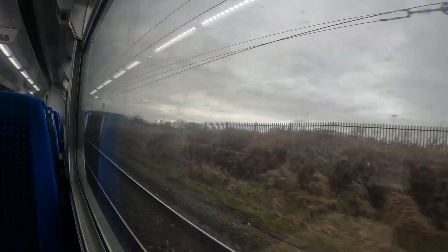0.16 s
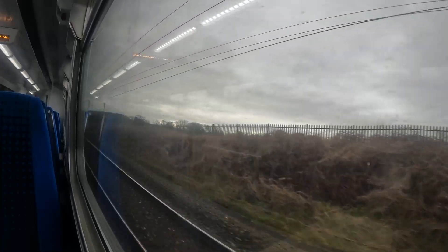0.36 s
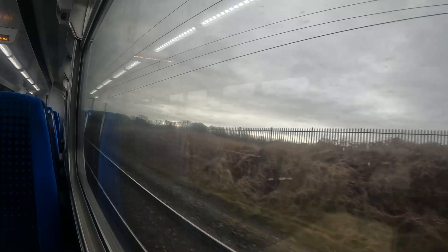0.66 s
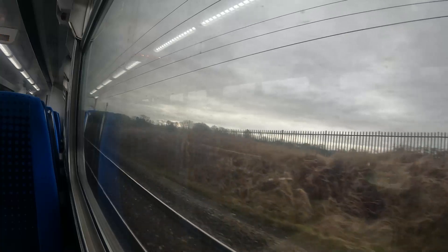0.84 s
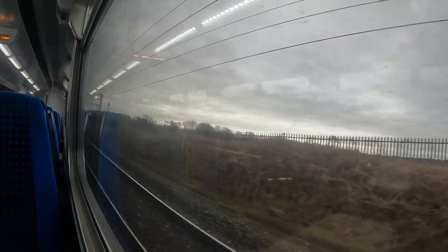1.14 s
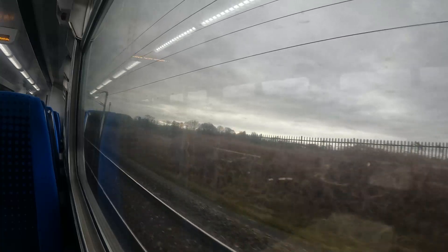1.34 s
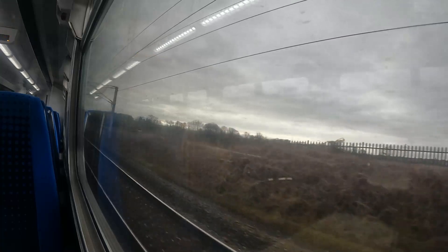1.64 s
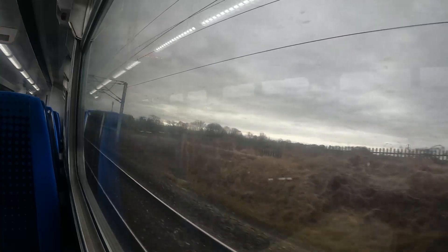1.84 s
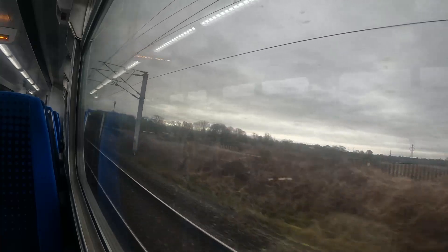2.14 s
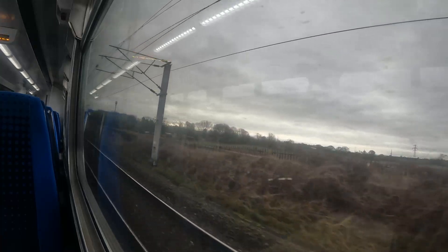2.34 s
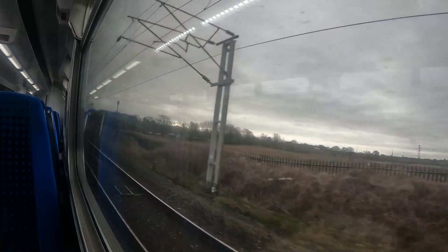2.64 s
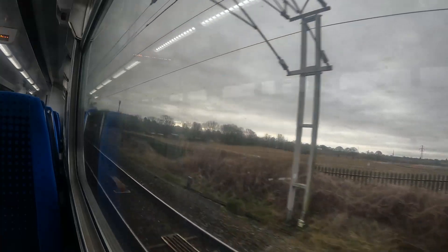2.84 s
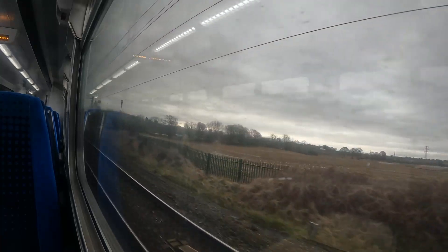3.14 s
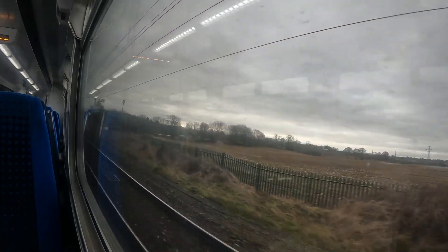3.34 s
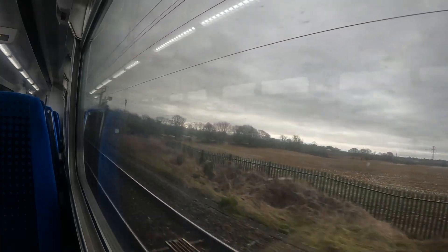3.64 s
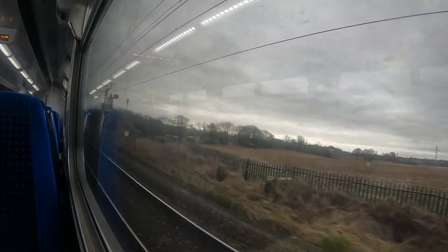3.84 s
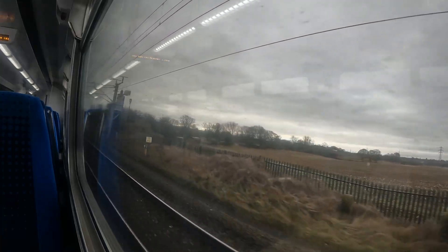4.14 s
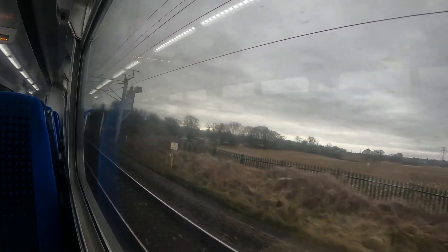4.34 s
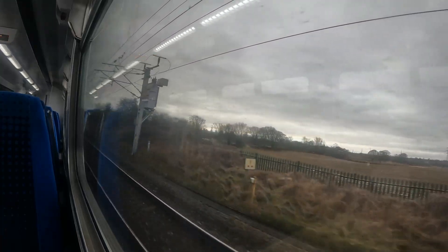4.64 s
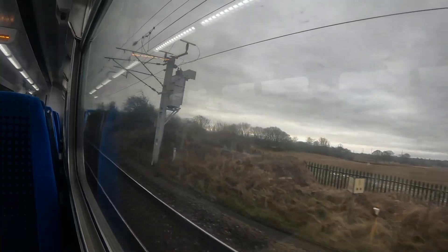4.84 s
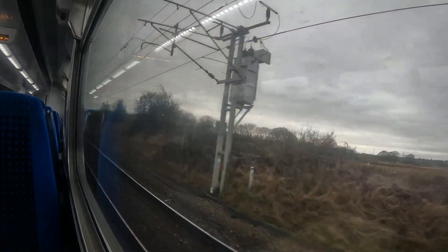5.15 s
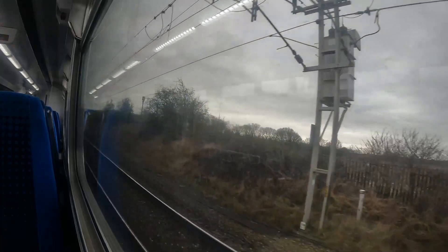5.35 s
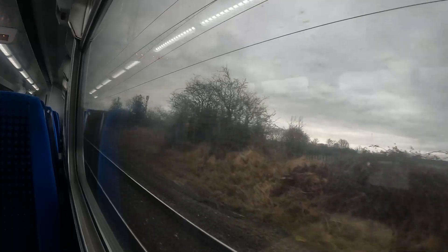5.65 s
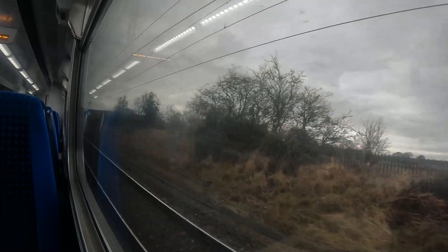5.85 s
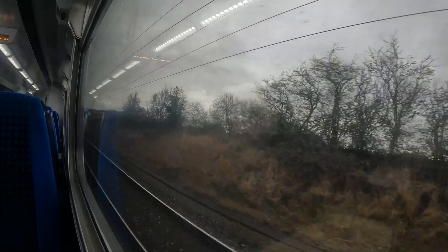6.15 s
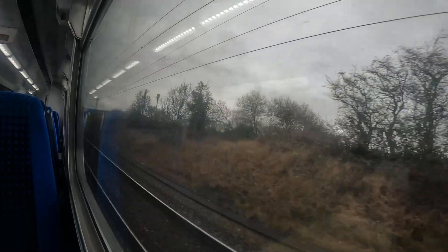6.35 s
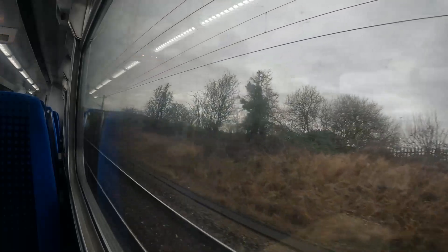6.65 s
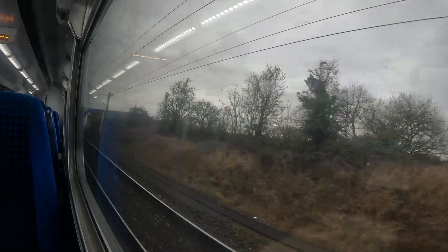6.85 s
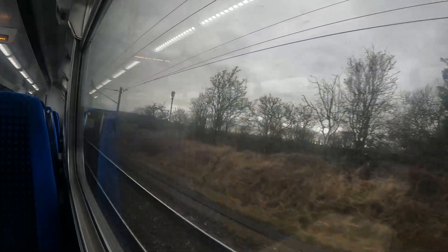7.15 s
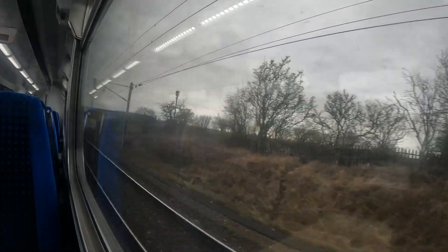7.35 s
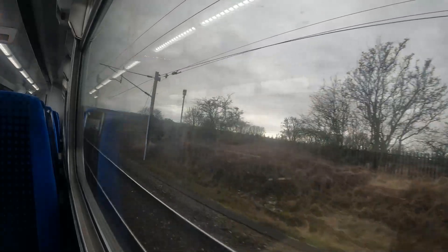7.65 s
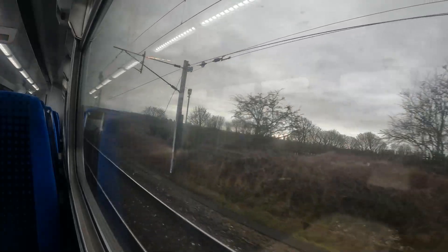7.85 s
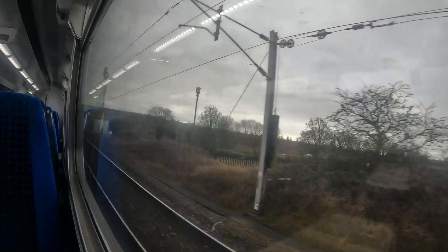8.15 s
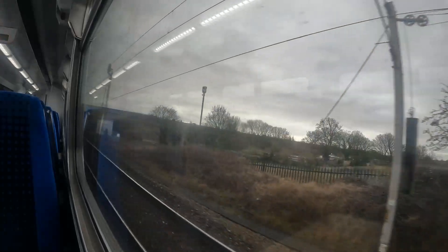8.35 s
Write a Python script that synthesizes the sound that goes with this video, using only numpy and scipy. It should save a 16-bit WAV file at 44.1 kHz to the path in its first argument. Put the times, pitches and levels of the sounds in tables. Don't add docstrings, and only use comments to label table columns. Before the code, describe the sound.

Inside the passenger compartment of a moving diesel railcar, a loud low engine drone dominates, felt through floor and panels, with a broad rumble of wheels and body beneath. From 0 to about 3.4 s the pitch is almost constant, with a thin gear whine slowly swelling and a light trim rattle around 3 s. At 3.4 s fuel is cut: the drone loosens and slides downward, the fine rattle calming except for small dry knocks near 3.8 and 4.1 s. Around 4.4 s the clutch takes up with a brief low surge, and trim shakes at 4.7 and 5.1 s. By 5.5 s the revs settle about two thirds as high, and a strong drone with a pulsing beat runs steadily to 8.5 s, with muted mechanical clatter, wheel noise and faint whine. A slight last rattle comes near 8.4 s. Close, boomy, little treble.

```python
import sys
import numpy as np
from scipy import signal
from scipy.io import wavfile

SR = 44100
rng = np.random.default_rng(int(sys.argv[2]) if len(sys.argv) > 2 else 0)


def unload_wav(signal):
    wavfile.write(
        sys.argv[1],
        SR,
        np.round(np.clip(np.atleast_2d(signal).T, -1, 1) * 32767).astype(np.int16),
    )


def linear_from_db(decibels):
    return 10 ** (np.asarray(decibels, float) / 20)


N = 374409
RUN_IN = SR
EARS = np.array([[1], [-1]])

# start_s, rate_hz
CYCLE = [(0, 16.081), (2.4, 16.102), (2.7, 15.999), (3.0, 16.025), (3.45, 15.69), (4.35, 12.576),
         (4.5, 11.821), (4.8, 11.145), (5.1, 10.876), (5.55, 10.66), (6, 10.67), (8.49, 10.798)]
# start_s, attack_s, hold_s, release_s
COASTING = (3.4, 0.2, 0.75, 0.3)


def rms_one(x):
    return x / np.sqrt(np.mean(x ** 2) + 1e-20)


def in_time(rows, lead=0):
    s, *columns = np.transpose(rows)
    return [np.interp(np.arange(-lead, N) / SR, s, c) for c in columns]


def stage(start_s, attack_s, hold_s, release_s, lead=0):
    corners_s = np.cumsum([start_s, attack_s, hold_s, release_s])
    return np.interp(np.arange(-lead, N) / SR, corners_s, [0, 1, 1, 0])


def at_hz(points, hz):
    points_hz, points_db = np.transpose(points)
    return np.interp(np.log(hz), np.log(points_hz), points_db)


def drift(rate_hz):
    r = np.exp(-80 * np.pi * rate_hz / SR)
    slow = signal.lfilter([1], [1, -2 * r, r * r], rng.standard_normal(N // 40 + 2002))[2000:]
    return np.interp(np.arange(N) / 40, np.arange(len(slow)), rms_one(slow))


def resonance(x, hz, width_hz):
    r = np.exp(-np.pi * width_hz / SR)
    numerator = np.array([1, 0, -1]) * (1 - r * r) / 2
    return signal.lfilter(numerator, [1, -2 * r * np.cos(2 * np.pi * hz / SR), r * r], x)


def coloured(spectrum, patchy_db, count):
    # hz, side_minus_mid_db
    side_spectrum = [(25, -14), (60, -29), (200, -16), (370, -17), (690, -16), (1260, -6), (2330, -7),
                     (4280, -7), (7880, -6), (14500, -3.5)]
    # hz, left_minus_right_db
    lean_spectrum = [(60, 0.0), (110, 0.0), (200, 0.5), (370, 0.0), (690, 2.5), (1260, 1.5), (2330, 2.5),
                     (4280, 0.5), (7880, 1.0), (14500, 3.0)]
    edges_hz = np.geomspace(spectrum[0][0], spectrum[-1][0], count + 1)
    white = rng.standard_normal((2, 2, N + RUN_IN // 2))
    out = 0
    for k, (low_hz, high_hz) in enumerate(zip(edges_hz, edges_hz[1:])):
        band = signal.butter(2, [low_hz, high_hz], "band", fs=SR, output="sos")
        mid, side = signal.sosfilt(band, white[k % 2])[:, -N:]
        hz = np.sqrt(low_hz * high_hz)
        pair = mid + linear_from_db(at_hz(side_spectrum, hz)) * side * EARS
        pair = pair * linear_from_db(at_hz(lean_spectrum, hz) / 2 * EARS)
        out = out + linear_from_db(at_hz(spectrum, hz) + patchy_db * drift(9)) * pair
    return rms_one(out)


def crank():
    rate_hz, = in_time(CYCLE, RUN_IN)
    first_firing_cycles = 0.16
    cycles = (np.cumsum(rate_hz) - RUN_IN * rate_hz[0]) / SR - first_firing_cycles
    return rate_hz, cycles


def rumble():
    # hz, density_db
    rumble_spectrum = [(8, 1), (25, 1), (45, -4), (90, -7), (150, 2), (250, -10.5), (330, -17),
                       (450, -32.5)]
    return linear_from_db(-24.5) * coloured(rumble_spectrum, patchy_db=1.36, count=8)


def rolling(beat):
    # hz, density_db
    rolling_spectrum = [(190, -37.5), (330, -1.5), (387, -6), (481, -3), (599, 0.5), (840, -11.5),
                        (934, -3), (1170, -7.5), (1680, -32.5), (2000, -37.5), (2600, -60), (4400, -120)]
    return linear_from_db(-33 + 0.23 * beat) * coloured(rolling_spectrum, patchy_db=1.0, count=9)


def clatter(octaves, beat):
    # hz, density_db
    clatter_spectrum = [(880, -27.5), (1500, -3.5), (1680, 2), (2060, 2.5), (2890, -8), (3140, -2),
                        (5200, -9.5), (6760, -55), (11400, -120)]
    level_db = -46 + 4.5 * octaves + 0.29 * beat
    return linear_from_db(level_db) * coloured(clatter_spectrum, patchy_db=0.5, count=5)


def rattle(octaves, beat):
    # hz, density_db
    rattle_spectrum = [(2760, -36), (4700, -17), (5040, 0.5), (6150, 3), (8200, -22), (9760, -13),
                       (10700, -9.5), (12000, -14.5), (13500, -18), (15000, -35.5)]
    # start_s, hold_s, level_db
    jolt_rows = [
        (1.275, 0.03, 4),
        (2.955, 0.5, 4.5),
        (3.81, 0.085, 4),
        (4.136, 0.045, 9.5),
        (4.432, 0.031, 1.5),
        (4.653, 0.15, 6),
        (5.08, 0.22, 4),
        (8.371, 0.2, 1),
    ]
    attack_s, release_s = 0.042, 0.05
    shake_db = sum(db * stage(s, attack_s, hold_s, release_s) for s, hold_s, db in jolt_rows)
    shake_db = shake_db + 1.5 * octaves - 5.5 * stage(*COASTING)
    buzz_db = 0.7 * beat + 0.57 * drift(14) + 2.2 * drift(70)
    trim = coloured(rattle_spectrum, patchy_db=0.7, count=13)
    top = signal.sosfiltfilt(signal.butter(2, 8500, "high", fs=SR, output="sos"), trim)
    return linear_from_db(-62 + buzz_db) * (linear_from_db(shake_db) * (trim - top) + linear_from_db(0.5 * shake_db) * top)


def whines():
    # hz, width_hz
    whine_peaks = [(918, 40), (1690, 170), (2821, 55), (2576, 30), (3384, 14), (611, 45), (6230, 400)]
    # start_s, attack_s, hold_s, release_s
    whine_swells = [(0.3, 2.6, 0.55, 1.5), (4.6, 0.7, 5, 0.5), (-1.5, 0.5, 3.33, 0.06),
                    (0.9, 0.2, 1.2, 0.1), (-1.5, 0.5, 3.3, 0.1), (1.5, 0.5, 3.3, 0.3),
                    (-1.5, 0.5, 6.3, 0.3)]
    # base_db, swell_db, clean_tone_share
    whine_mix = [(-45, 5, 0.2), (-54, 3.8, 0), (-76.5, 20.9, 1.3), (-78.5, 16, 1.2), (-85, 13, 0.9),
                 (-50.5, 5, 0.048), (-69.5, 4, 0.054)]
    out = 0
    for (hz, width_hz), swell, (base_db, swell_db, clean) in zip(whine_peaks, whine_swells, whine_mix):
        noise = rng.standard_normal((2, N))
        mid, side = resonance(resonance(noise, hz, width_hz), hz, width_hz)
        tone = clean * np.sqrt(2) * np.sin(2 * np.pi * hz * np.arange(N) / SR)
        whine = rms_one(rms_one(mid + 0.3 * side * EARS) + tone)
        out = out + linear_from_db(base_db + swell_db * stage(*swell)) * whine
    return out


def driveline():
    # start_s, shaft_hz
    shaft_rows = [(0, 64.85), (2.4, 65.557), (3.5, 65.7), (4.6, 66.205), (8.49, 67.35)]
    # multiple_of_shaft_rate, width_hz, level_db
    rail_hums = [(4.11, 6, -38.5), (4.48, 5.5, -38), (5.08, 11, -40), (3.5, 8.3, -46), (6.8, 2.2, -50.5)]
    shaft_db, start_turns = -32, -0.29
    turns = np.cumsum(in_time(shaft_rows)[0]) / SR
    out = linear_from_db(shaft_db + 1.0 * drift(2.7)) * np.sqrt(2) * np.cos(2 * np.pi * (turns + start_turns))
    for multiple, width_hz, db in rail_hums:
        angle = 2 * np.pi * multiple * turns
        hum = drift(width_hz / 2) * np.cos(angle) + drift(width_hz / 2) * np.sin(angle)
        out = out + linear_from_db(db) * hum
    return out


def engine(rate_hz, cycles):
    # strength, extra_path_ms
    cylinders = [(1.0, -6.17), (0.03, -5.14), (0.42, -6.62), (0.61, 0.76), (0.75, -6.53), (1.41, -8.0)]
    # first_load_db, otherwise_db
    mount_gains = [(10, 2.5), (0.5, 2), (2, 5.5), (-4.5, -3), (-5.5, 5.5), (1, 1.5), (2.5, -4), (5.5, 5),
                   (4.5, 0.5), (-3, 1.1), (1.5, 1), (14, 1.95), (-4, 2), (20.5, -2.5), (5.5, 0.5), (12, -1),
                   (-5, -3)]
    # hz, width_hz, level_db, polarity
    body_modes = [(67.5, 3.0, -38.1, 1), (100.9, 5.6, -45.3, 1), (121.1, 40.0, -35.4, -1),
                  (140.9, 3.7, -21.3, -1), (158.1, 30.2, -25.0, 1), (165.3, 8.0, -22.7, -1),
                  (172.8, 3.5, -36.7, -1), (191.2, 3.0, -38.0, 1), (227.9, 4.4, -38.0, -1)]
    # start_s, attack_s, hold_s, release_s
    first_load = (-2, 0.5, 4.7, 0.25)
    fuel_cut = (3.4, 0.15, 0.45, 0.2)
    clutch_slip = (4.15, 0.25, 0.05, 0.6)
    clutch_bite = (4.4, 0.07, 0.03, 0.07)
    stages = (first_load, COASTING, fuel_cut, clutch_slip, clutch_bite)
    load, coast, cut, slip, bite = (stage(*row, lead=RUN_IN) for row in stages)

    step = 16
    turns = []
    for j, (_, path_ms) in enumerate(cylinders):
        phase = cycles - j / 6 - rate_hz * path_ms / 1000
        turns.append(np.exp(2j * np.pi * phase[::step]))
    force = 0
    for order, (load_db, other_db) in enumerate(mount_gains, start=4):
        wave = sum(strength * turn ** order for (strength, _), turn in zip(cylinders, turns))
        gain_db = other_db + (load_db - other_db) * load[::step]
        if order == 6:
            gain_db = gain_db + (4.5 * slip + 13 * bite)[::step]
        if order >= 14:
            gain_db = gain_db - 7 * coast[::step]
        if order in (12, 13):
            gain_db = gain_db + 5 * cut[::step]
        sign = -1 if order == 4 else 1
        force = force + sign * linear_from_db(gain_db) * np.sqrt(2) * wave.real
    force = signal.resample_poly(force, step, 1)[:N + RUN_IN]

    force = force + linear_from_db(-14 - 3 * load) * rng.standard_normal(N + RUN_IN) * 20
    force = force * linear_from_db(-7.5 * bite)
    floor = sum(sign * linear_from_db(db) * resonance(force, hz, width_hz) for hz, width_hz, db, sign in body_modes)

    cradle_hz, cradle_width_hz, cradle_db = 21.5, 2.4, -24.5
    detuning = 2 * (2 * rate_hz - cradle_hz) / cradle_width_hz
    bounce = linear_from_db(cradle_db) / np.sqrt(1 + detuning ** 2)
    shake = -bounce * np.sqrt(2) * np.cos(4 * np.pi * cycles)
    return (floor + shake)[RUN_IN:]


def scene():
    rate_hz, cycles = crank()
    full_revs_hz = 16.1
    octaves = np.log2(rate_hz[RUN_IN:] / full_revs_hz)
    beat = np.cos(2 * np.pi * (cycles[RUN_IN:] - 0.4))
    background = rumble() + rolling(beat) + clatter(octaves, beat) + rattle(octaves, beat) + whines()
    lean_db = 0.85 * np.clip(1 - np.arange(N) / SR / 6.0, 0, 1) / 2 * EARS
    drone = driveline() + engine(rate_hz, cycles)
    return background + drone * linear_from_db(lean_db)


def low_pass(x):
    return signal.sosfilt(signal.butter(12, 15090, fs=SR, output="sos"), x)


def record(dry):
    dull = signal.sosfilt(signal.butter(8, 14000, fs=SR, output="sos"), dry)
    ceiling = 0.56
    limited = dull / (1 + np.abs(dull / ceiling) ** 4.6) ** (1 / 4)
    return low_pass(limited)


dry = scene()
out = record(dry)
unload_wav(out)
```